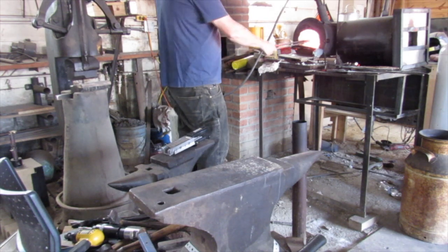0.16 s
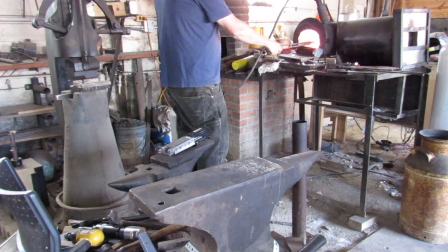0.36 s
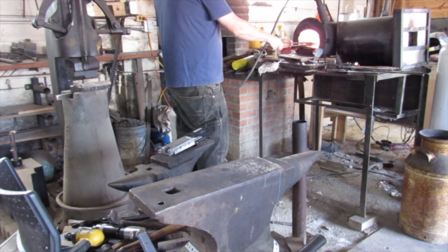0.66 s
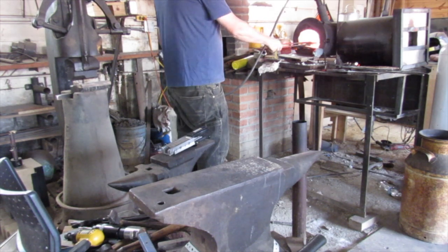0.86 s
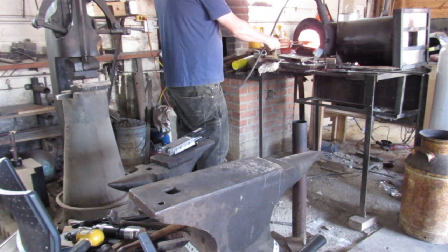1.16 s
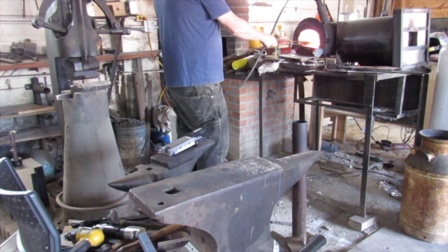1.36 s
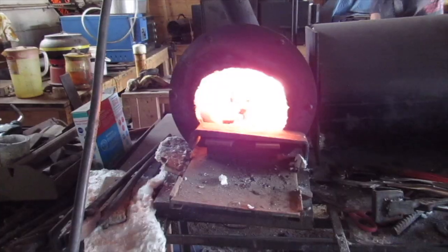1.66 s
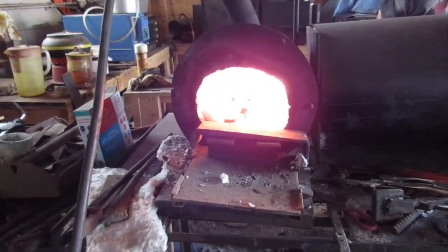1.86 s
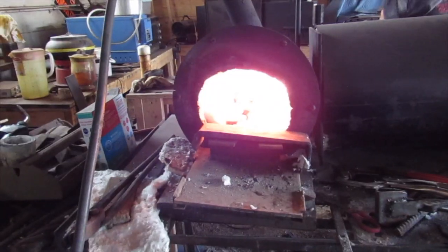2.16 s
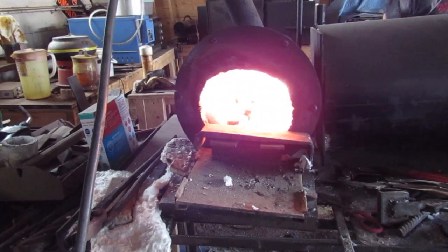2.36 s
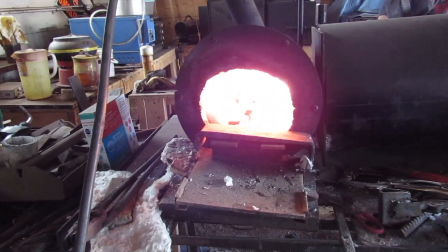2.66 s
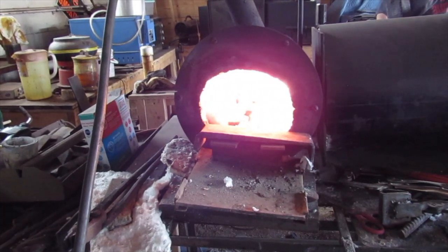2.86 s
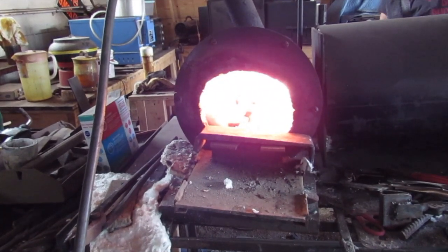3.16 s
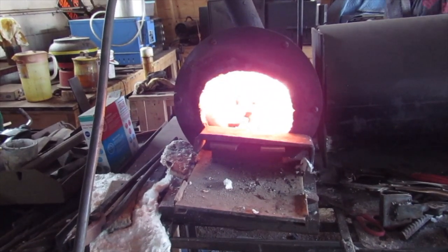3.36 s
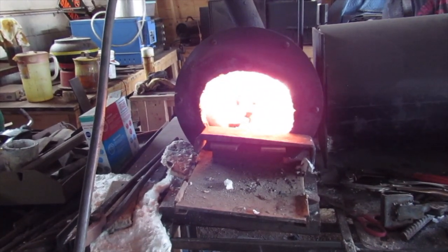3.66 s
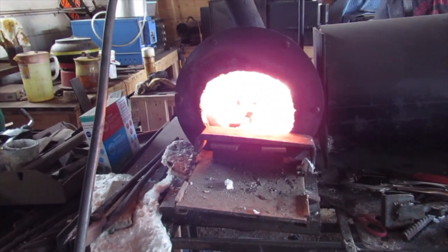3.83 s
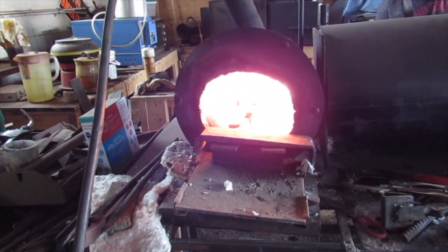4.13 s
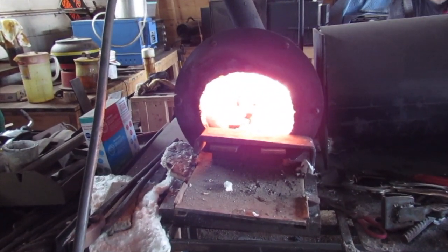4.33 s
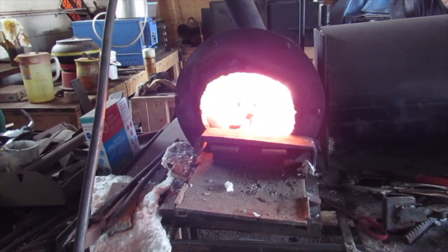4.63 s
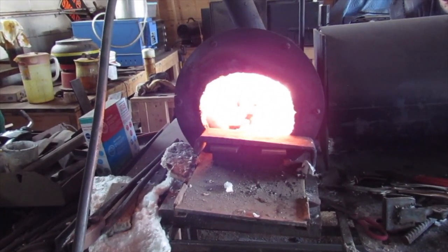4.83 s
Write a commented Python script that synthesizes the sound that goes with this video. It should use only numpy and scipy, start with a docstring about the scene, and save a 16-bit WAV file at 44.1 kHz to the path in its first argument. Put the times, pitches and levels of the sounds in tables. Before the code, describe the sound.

A gas forge burner rumbles with a faint hiss, first across a smithy with one tool clank, then louder up close.

```python
"""A gas forge burns in a smithy, heard first from across the shop: turbulent combustion rumbles in
the drum while the gas jet hisses above it. Loose iron clinks faintly, then a tool clanks at the forge
mouth and the room reverberates. The sound drops out briefly and returns with a surge close to the
mouth, where brief low thumps mark the turbulent roar and the hiss swells and sinks with the jet.
Near the end, loose iron clinks twice more."""
import sys
import numpy as np
from scipy import signal
from scipy.fft import rfft, irfft
from scipy.io import wavfile
from scipy.ndimage import uniform_filter1d, minimum_filter1d

SR = 44100
rng = np.random.default_rng(int(sys.argv[2]) if len(sys.argv) > 2 else 0)


def store_wav(level_fs):
    """Save 16-bit WAV to argv[1]."""
    pcm = np.round(np.clip(np.atleast_2d(level_fs), -1, 1) * 32767)
    wavfile.write(sys.argv[1], SR, pcm.T.astype(np.int16))


N = 220347
TIME = np.arange(N) / SR
HZ = np.maximum(np.arange(N + 1) * SR / (2 * N), 1)   # frequency grid of a signal padded to 2 N
FAR_END_S, NEAR_START_S = 1.612, 1.769


def from_db(db):
    """Amplitude ratio of a level in decibels."""
    return 10 ** (np.asarray(db) / 20)


def unit_rms(x):
    """Normalisation to unit power."""
    return x / np.sqrt(np.mean(x ** 2) + 1e-20)


def over_time(points):
    """Linear interpolation of a curve at every sample."""
    return np.interp(TIME, *np.transpose(points))


def over_hz(points):
    """Interpolation of a spectrum on a log-frequency axis."""
    hz, db = np.transpose(points)
    return np.interp(np.log(HZ), np.log(hz), db)


def colour(x, curve_db):
    """Minimum-phase filtering: a causal response with the given gain at each frequency."""
    cepstrum = irfft(np.log(from_db(curve_db)))
    folded = np.r_[cepstrum[0], 2 * cepstrum[1:N]]
    return irfft(rfft(x, 2 * N) * np.exp(rfft(folded, 2 * N)))[..., :N]


def resonances(modes):
    """Resonance lifts the spectrum and destructive interference notches it; dB at each frequency."""
    return sum(lift / (1 + (2 * (HZ - hz) / width) ** 2) for hz, width, lift in modes)


# Width of the sound field. Each row: frequency in Hz, relative side level in dB.
FIELD_WIDTH = [(30, -4.5), (130, -36), (260, -22), (500, -17), (1000, -14), (2000, -23.5), (4000, -27.5),
               (8000, -5.5), (13000, 0.5)]

def stereo_noise(wider_db):
    """Interaural coherence: noise mostly alike at both ears, but diffuse in the high treble."""
    mid, side = rng.standard_normal((2, N))
    return mid + colour(side, over_hz(FIELD_WIDTH) + wider_db) * [[1], [-1]]


def roar(spectrum, modes, puffs_per_s, puff_db, wider_db):
    """Combustion noise: the flame's steady turbulence and soft random puffs drive the drum's modes."""
    pulses = rng.random(N) < puffs_per_s / SR
    lowpass = signal.butter(4, 380, fs=SR, output="sos")
    soft_puffs = signal.sosfilt(lowpass, unit_rms(pulses * 1.) + 1e-18)
    drive = stereo_noise(wider_db) + from_db(puff_db) * soft_puffs
    return unit_rms(colour(drive, over_hz(spectrum) + resonances(modes)))


def early_reflections(strength, count=24):
    """Comb filtering: weak echoes off benches and walls interfere with the direct sound; gain in dB."""
    response = np.zeros(2 * N)
    signs = rng.choice([-1, 1], count)
    delays_s = rng.uniform(.001, .018, count)
    response[(delays_s * SR).astype(int)] = strength * signs / np.sqrt(count)
    response[0] = 1
    return 20 * np.log10(np.abs(rfft(response)) + 1e-3)


def drift(rate_hz):
    """Low-pass noise: a smooth random fluctuation of unit power."""
    return unit_rms(irfft(rfft(rng.standard_normal(2 * N)) / (1 + (HZ / rate_hz) ** 2))[:N])


def jet(curve_db, flicker_db, wider_db):
    """Jet noise: gas leaving the nozzle makes a broadband hiss whose level may flicker."""
    hiss = colour(stereo_noise(wider_db), curve_db + early_reflections(strength=0.29))
    return unit_rms(hiss) * from_db(flicker_db * drift(rate_hz=9.3))


# Spectra of the distant flame and jet. Each row: frequency in Hz, relative density in dB.
FAR_ROAR_SPECTRUM = [(25, -44.5), (50, -20.5), (90, -12.5), (150, -7), (215, -2.5), (310, -3), (370, -10.5),
                     (460, -26.5), (600, -30), (700, -38), (900, -34.5), (1300, -38), (2200, -45),
                     (3200, -61), (6000, -91.5)]
FAR_HISS_SPECTRUM = [(1650, -14.5), (2800, -4.5), (3270, -6.5), (4300, -8), (6060, -7), (9910, -9),
                     (10600, -9), (15000, -13)]
# Standing waves of shop and drum. Each row: frequency in Hz, width in Hz, lift in dB.
FAR_MODES = [(52.6, 8, -2), (63, 7.3, 1.5), (93.5, 5.2, 11.5), (208.6, 39, 3.5), (306.6, 9.4, 5),
             (428, 15, 6.5), (540, 6.7, 7), (658, 48, -11), (1039, 25, 8), (3420, 220, 3.5), (8250, 270, 3),
             (10060, 300, 5), (11950, 300, 2.5)]
# Envelope of the distant roar. Each row: time in seconds, level in dB.
FAR_ROAR_LEVEL = [(0.0, -33), (0.33, -31.5), (0.39, -34.5), (1.6, -33)]

def forge_far():
    """Standing waves colour the flame and the jet on their way across the shop."""
    flame = roar(FAR_ROAR_SPECTRUM, FAR_MODES, puffs_per_s=52, puff_db=-7, wider_db=1.5)
    hiss = jet(over_hz(FAR_HISS_SPECTRUM) + resonances(FAR_MODES), flicker_db=0.55, wider_db=-3.5)
    return from_db(over_time(FAR_ROAR_LEVEL)) * flame + from_db(-65) * hiss


# Loose ironwork. Each row: start in seconds, level in dB, T60 in seconds, three partials in Hz.
IRON_CLINKS = [(0.332, -71, 0.4, 2530, 3758, 3820), (3.831, -59.5, 0.76, 1695, 4130, 4344),
               (4.127, -57.5, 0.63, 1588, 5400, 8710)]
# Spectrum of the contact under a clink. Each row: frequency in Hz, relative density in dB.
CONTACT_SPECTRUM = [(700, -25.5), (1600, 4.5), (2400, 3), (4000, -6.5), (5500, -13.5), (9000, -10.5),
                    (15000, -19)]

def clinks(width_hz, lift_db):
    """Damped vibration: each nudged piece of iron rattles and rings at its own partials."""
    out = np.zeros(N)
    for start, db, t60, *partials in IRON_CLINKS:
        ringing = resonances([(hz, width_hz, lift_db) for hz in partials])
        rattle = unit_rms(colour(rng.standard_normal(N), over_hz(CONTACT_SPECTRUM) + ringing))
        out += rattle * (TIME > start) * from_db(db - 60 * np.abs(TIME - start) / t60)
    return out


# Reverberation time of the shop. Each row: frequency in Hz, T60 in seconds.
SHOP_DECAY = [(300, 0.93), (1000, 0.7), (2000, 0.62), (4000, 0.57), (12000, 0.5)]

def shop_reverberation(wider_db):
    """Reverberation: dense reflections decay exponentially, the treble first."""
    noise = rfft(stereo_noise(wider_db), 2 * N)
    centres, t60s = np.transpose(SHOP_DECAY)
    bands = [np.interp(np.log(HZ), np.log(centres), row) for row in np.eye(len(centres))]
    return sum(irfft(noise * band)[:, :N] * from_db(-60 * TIME / t60) for band, t60 in zip(bands, t60s))


# A tool knocks and skids on the forge mouth. Each row: start in seconds, relative level in dB.
TOOL_KNOCKS = [(0.402, -7.5), (0.413, -6.5), (0.418, 4.5), (0.436, -8), (0.463, -5)]
# Spectrum of one knock. Each row: frequency in Hz, relative density in dB.
KNOCK_SPECTRUM = [(250, -13.5), (450, 1), (580, -6.5), (690, -18), (810, -0.5), (1050, -1.5), (1300, -7),
                  (1650, -4.5), (2200, -19), (3000, -25), (6000, -34), (10000, -40.5), (15000, -50.5)]
# Resonances and notches of the iron. Each row: frequency in Hz, width in Hz, lift in dB.
IRON_MODES = [(463, 12, 4.5), (824, 32.7, -3.5), (896, 20, 6), (1086, 21, 5), (1094, 14, 6), (1120, 12, 3),
              (1390, 14, 6), (1615, 18, -3), (1340, 25, 3), (1890, 20, 1.5), (2326, 39, 11)]

def tool_clank(level_db):
    """Impact excitation: each of several quick contacts rings the iron's modes and fills the shop."""
    impacts = np.zeros(N)
    for start, db in TOOL_KNOCKS:
        impacts[round(start * SR)] += from_db(db + level_db)
    ring = colour(shop_reverberation(wider_db=3.5), over_hz(KNOCK_SPECTRUM) + resonances(IRON_MODES))
    return signal.fftconvolve(ring, impacts[None], axes=1)[:, :N]


def surge(height_db, settle_s):
    """Overshoot: the sound returns with raised gain and settles within moments."""
    return from_db(height_db * np.clip(1 - (TIME - NEAR_START_S) / settle_s, 0, 1))


def brighten(flame, gain, above_hz):
    """Shelving filter: the top of the roar rises and falls by a gain of its own."""
    upper = irfft(rfft(flame, 2 * N) / (1 + (above_hz / HZ) ** 6))[:, :N]
    return flame + upper * (gain - 1)


# Spectra of the close flame, jet and thin sizzle. Each row: frequency in Hz, relative density in dB.
NEAR_ROAR_SPECTRUM = [(20, -50.5), (40, -28.5), (70, -20), (105, -10), (170, -3), (250, -3), (330, -15.5),
                      (460, -22), (600, -35.5), (720, -42.5), (900, -38), (1300, -46.5), (2100, -50),
                      (3200, -64.5), (6000, -100)]
NEAR_HISS_SPECTRUM = [(1650, -24), (2800, 0), (3000, -13), (3270, -3), (5890, -3), (9300, -2.5),
                      (10100, -4.5), (15000, -9)]
SIZZLE_SPECTRUM = [(8500, -34), (9600, -19), (9930, 1.5), (10150, -1), (10700, -5), (12000, -8),
                   (14000, -26)]
# Standing waves at the mouth. Each row: frequency in Hz, width in Hz, lift in dB.
NEAR_MODES = [(51.7, 11, -3.5), (72, 20, 6.5), (174, 54, 1.5), (200.2, 20, 2), (323.7, 7.5, 8.5),
              (375.7, 11.4, 4.5), (394.4, 35, -10.5), (441.4, 12.6, 4.5), (480.5, 24, 3.5), (526, 20, 2.5),
              (713, 47, -8), (846, 180, 3), (1093, 25, 4.5), (2070, 25, 8), (3360, 210, 4), (8240, 310, 2)]
# The close roar eases and picks up again. Each row: time in seconds, base level in dB.
NEAR_ROAR_LEVEL = [(2.1, -23.5), (2.55, -24.5), (4.3, -24.5), (4.95, -22.5)]
# The jet swells about once a second. Each row: time in seconds, relative level in dB.
JET_SWELL = [(1.85, -67.5), (2.03, -64), (2.27, -71.5), (2.82, -63.5), (2.95, -69.5), (3.35, -70.5),
             (3.87, -65.5), (4.02, -71), (4.3, -68), (4.76, -64.5), (4.97, -67.5)]

def forge_near():
    """Amplitude modulation: at the mouth, hiss, sizzle and the top of a deeper roar follow the jet."""
    jet_db = over_time(JET_SWELL)
    swing_db = jet_db - jet_db[TIME > NEAR_START_S].mean()
    flame = roar(NEAR_ROAR_SPECTRUM, NEAR_MODES, puffs_per_s=28, puff_db=-8, wider_db=-0.5)
    top_gain = from_db(0.43 * swing_db) * surge(height_db=5, settle_s=0.06)
    flame = brighten(flame, top_gain, above_hz=560)
    flame *= from_db(over_time(NEAR_ROAR_LEVEL)) * surge(height_db=6, settle_s=0.05)
    hiss = jet(over_hz(NEAR_HISS_SPECTRUM) + resonances(NEAR_MODES), flicker_db=0.5, wider_db=-1.5)
    hiss *= from_db(-63 + 0.69 * swing_db)
    sizzle = jet(over_hz(SIZZLE_SPECTRUM), flicker_db=0, wider_db=-7.5)
    sizzle *= from_db(-71.5 + swing_db + sizzle_flares(rise_s=0.04, fall_s=0.07))
    return flame + (hiss + sizzle) * surge(height_db=13, settle_s=0.065)


# Brief low thumps in the turbulent roar. Each row: start in seconds, relative peak level in dB.
ROAR_THUMPS = [(1.772, -12), (1.811, -11), (2.019, -10), (2.096, -16), (2.136, -12.5), (2.175, -23),
               (2.215, -13.5), (2.395, -10), (2.853, -9.5), (2.958, -11.5), (3.250, -12), (3.917, -13.5)]

def roar_thumps(cutoff_hz):
    """Impulse response: each thump is a low pulse of a cycle or two with the colour of the roar."""
    response = colour(signal.unit_impulse(N), over_hz(NEAR_ROAR_SPECTRUM) + resonances(NEAR_MODES))
    thump = signal.sosfilt(signal.butter(2, cutoff_hz, fs=SR, output="sos"), response[:SR // 4])
    kicks = np.zeros(N)
    for start, db in ROAR_THUMPS:
        kicks[round(start * SR)] = from_db(db)
    return signal.fftconvolve(kicks, thump / np.abs(thump).max())[:N]


# Brief flares of the sizzle. Each row: time of the peak in seconds, lift in dB.
SIZZLE_FLARES = [(2.82, 2), (4.41, 5.5), (4.76, 5)]

def sizzle_flares(rise_s, fall_s):
    """Asymmetric Gaussian envelopes: each flare rises and falls back; dB at every sample."""
    return sum(lift * np.exp(-((TIME - peak) / np.where(TIME < peak, rise_s, fall_s)) ** 2)
               for peak, lift in SIZZLE_FLARES)


def scene():
    """Superposition of the sources: across the shop, then, after a short silence, at the mouth."""
    fade_out = np.clip((FAR_END_S - TIME) / .004, 0, 1)
    fade_in = np.clip((TIME - NEAR_START_S) / .001, 0, 1)
    far = forge_far() + tool_clank(level_db=-25.5)
    near = forge_near() + roar_thumps(cutoff_hz=312)
    return fade_out * far + fade_in * near + clinks(width_hz=80, lift_db=14.5)


def record(dry):
    """Peak limiting holds down the highest peaks, and a steep low-pass cuts the top."""
    ceiling, window, cutoff_hz = .315, int(.006 * SR), 15050
    needed_gain = ceiling / np.maximum(np.abs(dry).max(axis=0), ceiling)
    gain = uniform_filter1d(minimum_filter1d(needed_gain, size=window), size=window)
    lowpass = signal.ellip(12, .1, 80, cutoff_hz, fs=SR, output="sos")
    return signal.sosfilt(lowpass, dry * gain)


dry = scene()
out = record(dry)
store_wav(out)
```